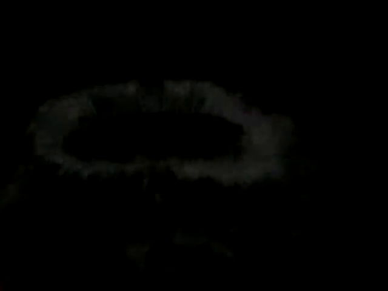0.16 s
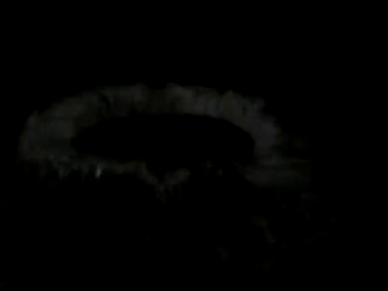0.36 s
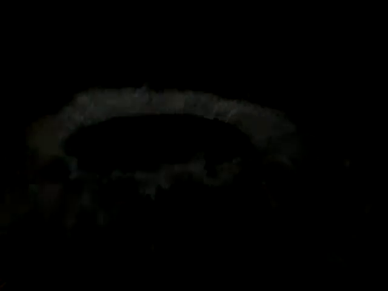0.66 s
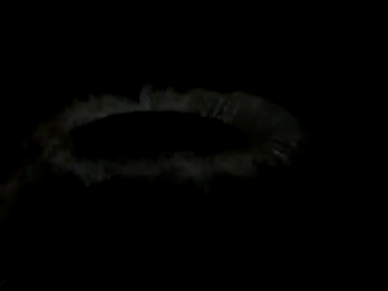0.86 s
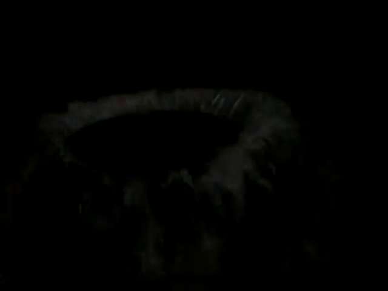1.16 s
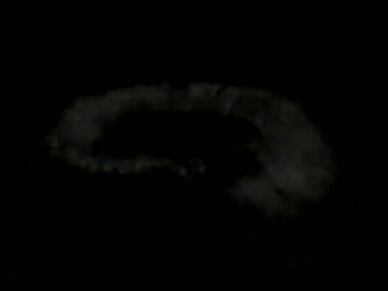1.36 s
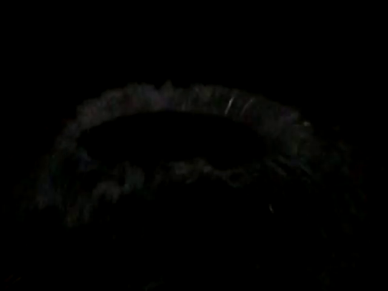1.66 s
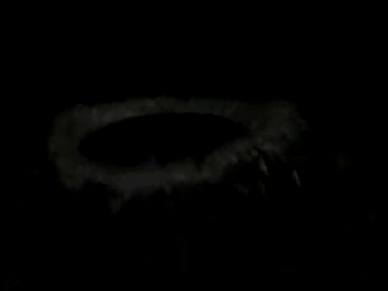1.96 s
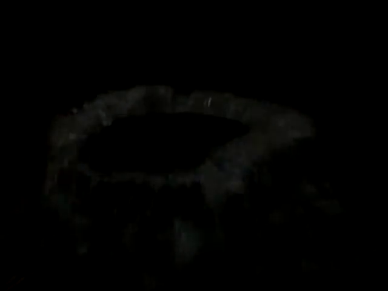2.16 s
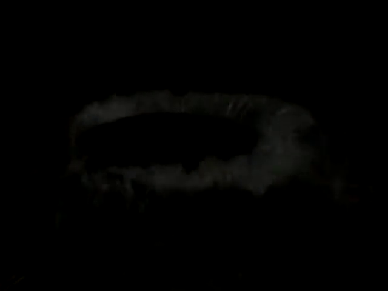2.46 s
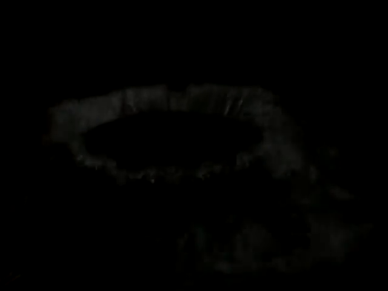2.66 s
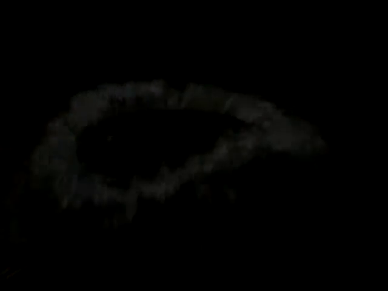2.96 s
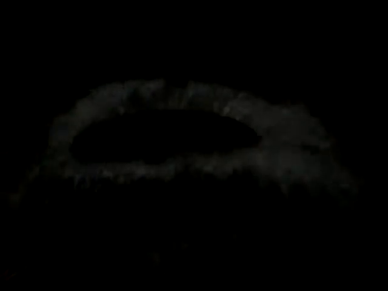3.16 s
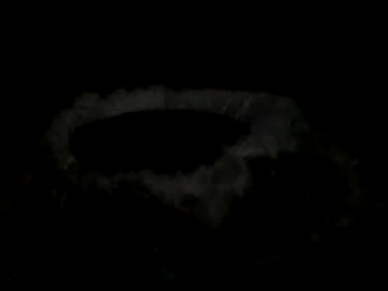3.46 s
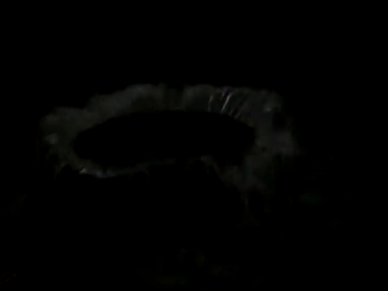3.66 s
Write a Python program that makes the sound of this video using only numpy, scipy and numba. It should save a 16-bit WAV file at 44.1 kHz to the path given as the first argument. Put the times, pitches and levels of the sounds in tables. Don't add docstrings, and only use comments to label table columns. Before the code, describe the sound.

Water gushes up around a loose iron manhole lid on a road at night, bright froth, bubbling pops and slaps throughout, faint lid thuds underneath; close mono microphone a couple of metres away, outdoors.

```python
import sys
import numpy as np
from scipy import signal
from scipy.fft import rfft, irfft
from scipy.io import wavfile
from scipy.ndimage import uniform_filter1d
from numba import njit

SR = 44100
rng = np.random.default_rng(int(sys.argv[2]) if len(sys.argv) > 2 else 0)


def persist_wave(psi):
    counts = np.round(np.clip(psi, -1, 1) * 32767).astype(np.int16)
    wavfile.write(sys.argv[1], SR, np.atleast_2d(counts).T)


def boost(x):
    u = np.asarray(x, float) / 20
    return 10 ** u


N = 167580


def level(x, db):
    return x * boost(db) / np.sqrt(np.mean(x ** 2))


def band(x, hz, width):
    return signal.lfilter(*signal.iirpeak(min(hz, .45 * SR), hz / width, fs=SR), x)


def walk(rate):
    hold = int(SR / rate)
    steps = np.repeat(rng.standard_normal(N // hold + 1), hold)
    return 1.5 * uniform_filter1d(uniform_filter1d(steps, hold), hold)[:N]


def shape(x, db_of_hz):
    hz = np.maximum(np.fft.rfftfreq(4096, 1 / SR), 1)
    cepstrum = irfft(np.log(boost(db_of_hz(hz))))
    cepstrum[1:2048] *= 2
    cepstrum[2049:] = 0
    impulse = irfft(np.exp(rfft(cepstrum)))
    return signal.fftconvolve(x, impulse)[:N]


@njit
def ring(start, hz, cycles, rise, size, out_len, rate):
    out = np.zeros(out_len)
    for k in range(len(start)):
        n = int(cycles[k] * rate / hz[k]) + 2
        phase, env, fade = 0., size[k], np.exp(-5.76 / n)
        for i in range(min(n, out_len - start[k])):
            phase += 6.2832 * hz[k] * (1 + rise[k] * (2.5 * i / n) ** 2) / rate
            onset = min(phase / 3.1416, 1.)
            out[start[k] + i] += env * onset * np.sin(phase)
            env *= fade
    return out


def grains(s, hz, cycles, rise, size):
    one = np.ones(len(s))
    start = (np.clip(s, 0, None) * SR).astype(np.int64)
    pitch = np.minimum(hz, .3 * SR) * one
    return ring(start, pitch, cycles * one, rise * one, size * one, N, float(SR))


def bursts(rows, length_s, q):
    lead_s = .003
    out, t = np.zeros(N + SR), np.arange(2000) / SR
    swell = (t / length_s) ** 2 * np.exp(-3 * t / length_s)
    for (s, db, hz), noise in zip(rows, rng.standard_normal((len(rows), len(t)))):
        puff = band(band(noise * swell, hz, hz / q), hz, hz / q)
        first = int((s - lead_s) * SR)
        out[first:first + len(t)] += puff * boost(db) / np.abs(puff).max()
    return out[:N]


def froth():
    bass_gaps_db = 2.5
    patter = 0.11 * walk(14) + 0.64 * walk(40.0) + 1.1 * walk(150)
    out, gust = 0, walk(12)
    for hz in 30 * 2 ** np.arange(0, 9.4, .5):
        gust = .8 * gust + .6 * walk(12)
        db = patter * min(hz / 2500.0, 1.2) + 0.43 * gust + 0.63 * walk(24.9)
        db = db + bass_gaps_db * walk(14) * (hz < 400)
        out = out + boost(db) * band(rng.standard_normal(N), hz, hz * 0.4) / np.sqrt(hz)
    return level(out, 0)


def cloud(per_s, lo_hz, hi_hz, cycles, rise, scatter_db, clump_db, clump_rate):
    u = rng.random((int(per_s * N / SR), 4)).T
    s = u[0] * (N - 1) / SR
    hz = lo_hz * (hi_hz / lo_hz) ** u[1]
    clump = clump_db * walk(clump_rate)[(s * SR).astype(int)]
    db = np.minimum(-scatter_db * np.log(1 - u[2]) + clump, 10.5)
    return level(grains(s, hz, cycles * (.5 + u[3]), rise, boost(db) * hz), 0)


def bubbles():
    return cloud(3500, 378.5, 8050.0, cycles=13.4, rise=0.077,
                 scatter_db=1.5, clump_db=1.5, clump_rate=30)


def spray():
    return cloud(3000, 3140.0, 11200.0, cycles=7.7, rise=.0,
                 scatter_db=4.5, clump_db=2.0, clump_rate=45)


# [Hz, dB per Hz]
RUSH_COLOUR = [(15, -55), (25, -52.5), (189, -22), (586, -6), (747, -3), (1680, -1), (2880, 1.5),
               (13400, -7.5), (15700, -15)]
# [Hz, Hz, dB]
HOLLOWS = [(758, 88, 3.5), (1118, 285, 2.5), (592, 100, -4), (1734, 300, -2.5), (2710, 1200, 2.5),
           (434, 100, 1.5), (280, 140, -3), (181, 62, 3), (5330, 1600, 2.5), (14400, 1500, 3.5)]


def rush_db(hz):
    table = np.array(RUSH_COLOUR)
    bumps = sum(db * np.exp(-((hz - f) / w) ** 2 * 2) for f, w, db in HOLLOWS)
    return np.interp(np.log(hz), np.log(table[:, 0]), table[:, 1]) + bumps


# [s, dB, dB per octave]
SURGE = [(0.0, -26, 0), (0.28, -25, 1.5), (0.35, -28, -0.5), (0.45, -24.5, -1), (1.46, -23.5, 0.0),
         (1.56, -25, 1), (1.64, -23, 0), (1.8, -24.5, -2), (2.141, -21.5, 0), (2.24, -24.5, 1),
         (2.54, -22.5, 0.5), (2.64, -23.5, -1), (2.76, -28.5, -2.5), (3.0, -24, 0.5), (3.08, -27, 1.5),
         (3.56, -24.5, 0.0), (3.63, -27.5, -1.5), (3.8, -28, -2.5)]


def surging_water():
    t, surge = np.arange(N) / SR, np.array(SURGE)
    white = boost(0.5) * froth() + boost(-7) * bubbles() + boost(-10.5) * spray()
    water = level(shape(white, rush_db), 0)
    bright = np.clip(0.057 * np.interp(t, surge[:, 0], surge[:, 2]), -.8, .8)
    dull = signal.lfilter(*signal.butter(1, 2000., fs=SR), water)
    tilted = water + bright * (water - 2 * dull)
    return tilted * boost(np.interp(t, surge[:, 0], surge[:, 1]))


# [s, dB, s, Hz]
CRASHES = [(0.033, 3, 0.017, 2600), (0.266, 4, 0.037, 1800), (0.21, 2, 0.013, 1500), (0.363, 1, 0.06, 2010),
           (0.684, 2.5, 0.038, 2500), (0.97, 0.5, 0.016, 1200), (1.101, 5, 0.015, 3600),
           (1.21, 0.5, 0.11, 2750), (1.442, 1, .05, 1500), (1.148, 3.5, 0.015, 2800),
           (1.266, 2, 0.024, 2800), (1.44, 1.5, 0.063, 3000), (1.48, 3.5, 0.023, 1100),
           (1.546, 0, 0.012, 2000), (1.377, -4, 0.011, 2000), (1.632, 4.5, 0.015, 1600),
           (1.98, -0.5, 0.034, 3000), (2.13, 1, 0.064, 2500), (2.432, 1.5, 0.019, 3040),
           (2.538, 3, 0.028, 2500), (2.57, 3.5, 0.031, 950), (2.62, 1.5, 0.016, 2000),
           (2.716, 3.5, 0.01, 2500), (2.928, 0, .03, 1000), (3.03, 4.5, 0.045, 1190),
           (3.297, 0.5, 0.047, 3000), (3.555, 3.5, 0.019, 1500)]


def crashes(water):
    width_ratio = 2.2
    t, out = np.arange(N) / SR, water
    for s, db, half_s, hz in CRASHES:
        part = band(band(water, hz, hz * width_ratio), hz, hz * width_ratio)
        out = out + (boost(db) - 1) * np.exp(-((t - s) / half_s) ** 2) * part
    return out


# [s, dB, Hz]
SLAPS = [(0.0817, -14, 2490), (0.1501, -17, 2490), (0.4259, -16, 2580), (0.4953, -14.5, 2800),
         (0.7532, -18, 2320), (0.8425, -15.5, 2920), (1.0141, -15, 2500), (1.1039, -12.5, 2500),
         (1.1358, -18, 2940), (1.1927, -14, 2650), (1.2256, -15, 2910), (1.256, -13, 2510),
         (1.3887, -20, 3360), (1.4197, -13.5, 3300), (1.709, -15, 3630), (1.9769, -14, 2200),
         (2.0348, -16, 2760), (2.2643, -18, 3180), (2.397, -19, 3340), (2.4872, -15, 2860),
         (2.9153, -16.5, 2790), (3.0934, -16.5, 3000), (3.1188, -18, 2400), (3.5129, -17, 2800)]


def slaps():
    return bursts(SLAPS, length_s=.005, q=3.2)


# [s, dB, Hz,
# cycles, share of pitch]
GLUGS = [(1.889, -22, 365, 44, 1.0), (2.988, -17, 5250, 36, .02), (2.994, -14, 5150, 36, 0.23),
         (2.6, -18, 5400, 16, .02), (3.005, -19, 1100, 12, .1), (3.026, -18, 1250, 12, .1),
         (2.12, -26.5, 540, 12, 0.45), (2.3, -30, 520, 14, .25), (2.616, -31, 330, 10.6, 0.29),
         (3.517, -26.5, 380, 11, 0.013), (2.7, -21, 680, 12, 0.15), (1.2, -25, 540, 12, .03),
         (1.127, -25.5, 480, 12, 0.42), (3.098, -36, 280, 29, .9), (3.48, -43, 155, 8.8, .05),
         (2.2, -32, 320, 12, .05), (3, -30, 570, 10, .05), (3.1, -28, 480, 12, 0.13),
         (2.28, -34, 314, 7.1, .2), (1.515, -38, 110, 2, .0), (1.99, -29, 410, 17, .0),
         (1.905, -30, 350, 8, .0), (2.83, -29.5, 456, 20, .02), (2.4, -14, 2300, 15, .02)]


def glugs():
    s, db, hz, cycles, rise = np.array(GLUGS).T
    return grains(s, hz, cycles * 2, rise * 2, boost(db))


# [s, dB, Hz]
PLOPS = [(0.136, -26, 1120), (0.208, -20, 929), (0.237, -18, 750), (0.27, -17, 810), (0.375, -16.5, 1520),
         (0.549, -21, 1080), (0.649, -17, 1110), (0.712, -17, 1070), (0.811, -19, 735), (0.971, -16, 956),
         (0.998, -18, 1190), (1.085, -16.5, 950), (1.149, -15, 1300), (1.22, -21, 1180), (1.239, -16, 940),
         (1.266, -21, 826), (1.393, -17, 1323), (1.444, -18, 1430), (1.467, -21, 790), (1.501, -14, 970),
         (1.601, -20, 834), (1.626, -11.5, 1160), (1.688, -13.5, 1050), (1.891, -22, 738),
         (1.988, -19, 1200), (2.033, -17, 1070), (2.072, -21, 1130), (2.1, -18, 762), (2.192, -25, 1300),
         (2.241, -28, 1160), (2.285, -25, 770), (2.475, -21, 996), (2.536, -17.5, 730), (2.573, -12.5, 720),
         (2.698, -21, 1110), (2.804, -18, 760), (2.823, -21, 1110), (2.899, -14.5, 773), (2.942, -19, 1110),
         (2.981, -16, 1010), (3.017, -11.5, 1043), (3.294, -15, 1080), (3.458, -29, 1060),
         (3.694, -20, 1080)]


def plops():
    s, db, hz = np.array(PLOPS).T
    return grains(s, hz, 29, 0.13, boost(db - 3.5))


# [s, dB, Hz]
THUDS = [(0.489, -38, 212), (0.685, -55, 231), (1.023, -34, 228), (1.307, -44, 240), (1.463, -37.5, 230),
         (1.601, -37, 248), (1.886, -26.5, 195), (2.021, -32.5, 245), (2.261, -47, 237),
         (2.393, -39.5, 209), (2.824, -34.5, 219), (3.095, -32, 221), (3.354, -39.5, 207),
         (3.45, -35.5, 170.6)]
# [Hz, dB, s]
IRON_RING = [
    (179.2, -10, 0.33),
    (228, -6.5, 0.15),
]


def lid():
    s, db, hz = np.array(THUDS).T
    gulp = grains(s, hz, 34, 0.16, boost(db))
    upper = grains(s, 1.95 * hz, 34, 0.062, boost(db - 12))
    thump = grains(s, 0.8 * hz, 16, .0, boost(db - 5))
    iron = sum(grains(s, f, t60 * f, .0, boost(db + ring_db)) for f, ring_db, t60 in IRON_RING)
    return gulp + upper + thump + iron


# [s, dB, Hz]
TICKS = [(0.3935, -32, 8380), (0.4254, -28, 7200), (0.597, -22, 8240), (0.681, -17, 7250),
         (1.104, -17, 7230), (1.527, -25, 13000), (1.949, -18.5, 7010), (1.9844, -19, 8400),
         (2.341, -22, 7220), (2.418, -24, 7040), (2.6903, -26, 7110), (2.9165, -25, 10500),
         (3.0264, -27, 7180), (3.0773, -16, 5200), (3.5558, -21, 7340), (3.641, -28, 7300),
         (3.768, -27, 7180)]


def ticks():
    return bursts(TICKS, length_s=.004, q=2.6)


# [s, dB, Hz]
MORE_TICKS = [(0.2713, -23.5, 8800), (0.3845, -26, 8790), (0.4254, -26, 8900), (0.4998, -27, 10400),
              (0.5237, -28, 10500), (0.9033, -25, 9060), (0.9797, -22, 10600), (1.1014, -26, 9160),
              (1.2516, -25, 8960), (1.289, -25, 9160), (1.5259, -28, 8930), (1.9485, -30, 8740),
              (1.9844, -34, 10700), (1.9844, -25, 8500), (2.5272, -18, 8730), (2.6933, -28, 9610),
              (2.9158, -19, 8850), (3.0764, -17.5, 9700), (3.5638, -20.5, 9100)]


def more_ticks():
    return bursts(MORE_TICKS, length_s=.004, q=2.6)


# [Hz, dB per Hz]
TOWN_COLOUR = [(20, -3), (60, 1), (120, -9), (250, -17), (600, -42)]


def town():
    table = np.array(TOWN_COLOUR)

    def colour(hz):
        return np.interp(np.log(hz), np.log(table[:, 0]), table[:, 1])

    return level(shape(rng.standard_normal(N), colour) * boost(1.8 * walk(14)), -66)


def scene():
    water = crashes(surging_water())
    hits = slaps() + glugs() + plops() + lid() + ticks() + more_ticks()
    hits = signal.lfilter(*signal.butter(2, 90., "high", fs=SR), hits)
    return (water + hits + town())[None]


def band_limit(x):
    return signal.sosfilt(signal.butter(12, 15890, fs=SR, output="sos"), x)


def record(dry):
    notch_hz, notch_width_hz, notch_keep, top_hz = 7720, 310, .1, 15700
    notched = dry - (1 - notch_keep) * band(dry, notch_hz, notch_width_hz)
    top_cut = signal.ellip(10, .2, 80, top_hz, fs=SR, output="sos")
    mix = signal.sosfilt(top_cut, notched)
    return band_limit(mix)


dry = scene()
out = record(dry)
persist_wave(out)
```